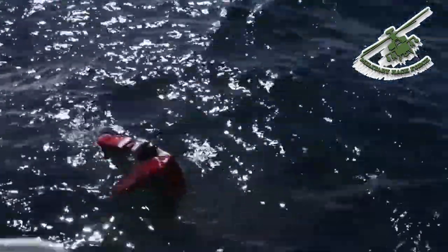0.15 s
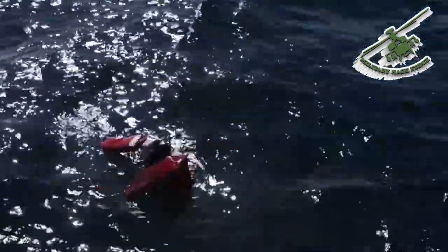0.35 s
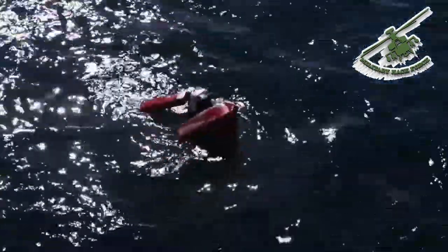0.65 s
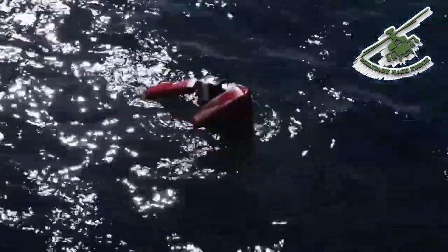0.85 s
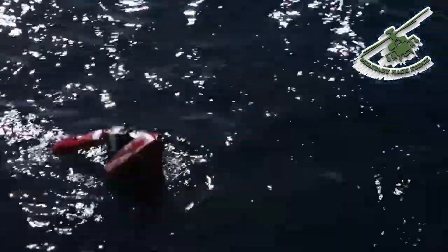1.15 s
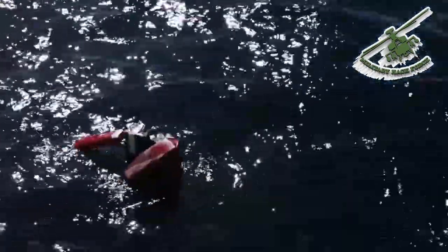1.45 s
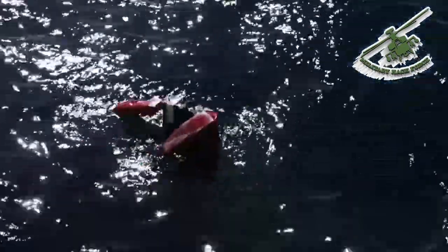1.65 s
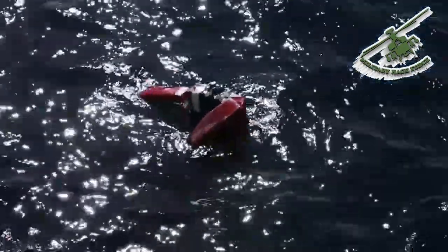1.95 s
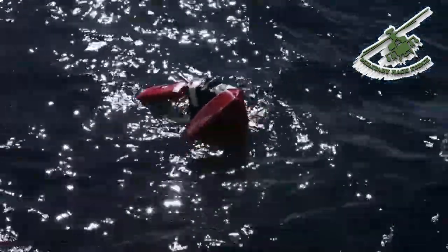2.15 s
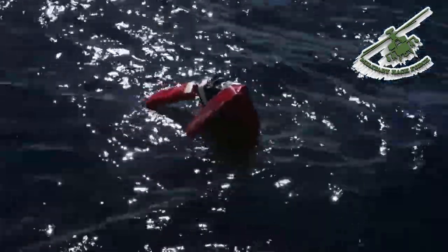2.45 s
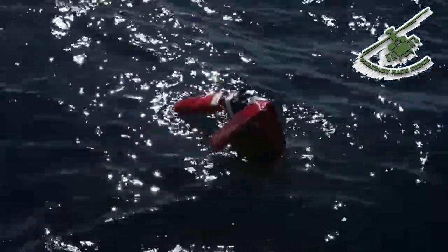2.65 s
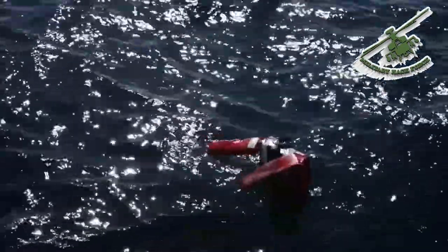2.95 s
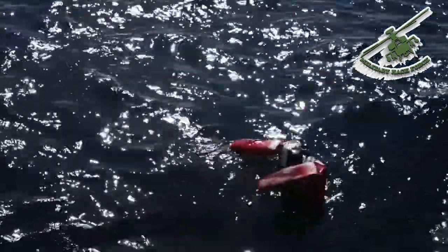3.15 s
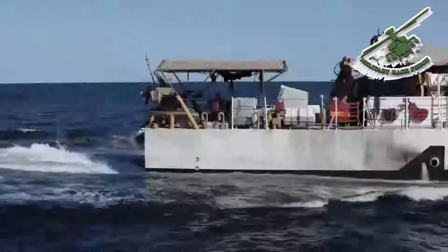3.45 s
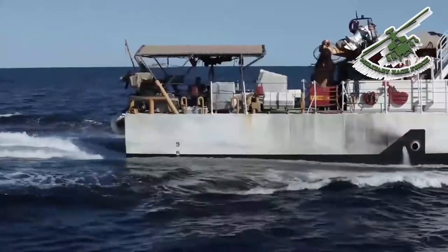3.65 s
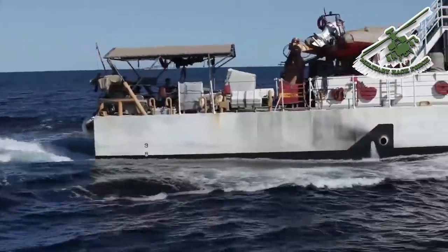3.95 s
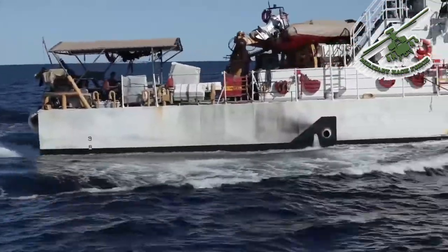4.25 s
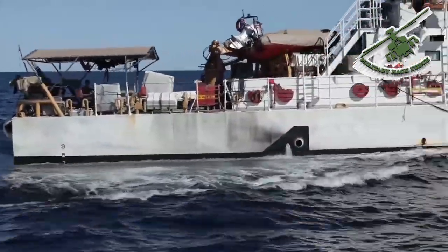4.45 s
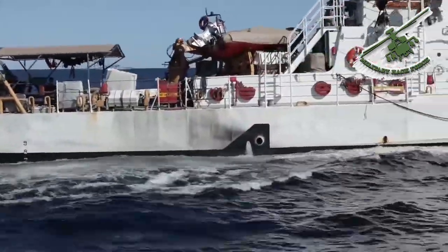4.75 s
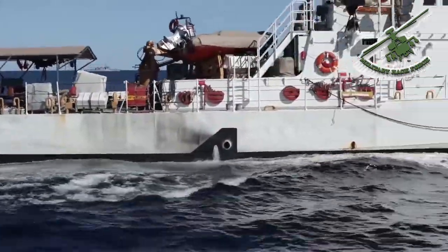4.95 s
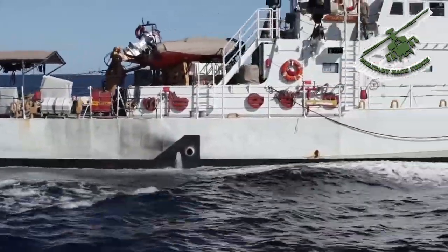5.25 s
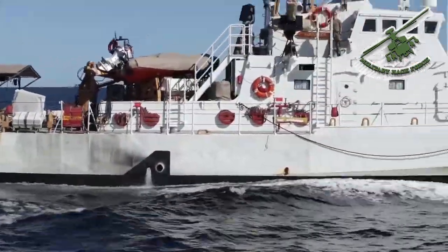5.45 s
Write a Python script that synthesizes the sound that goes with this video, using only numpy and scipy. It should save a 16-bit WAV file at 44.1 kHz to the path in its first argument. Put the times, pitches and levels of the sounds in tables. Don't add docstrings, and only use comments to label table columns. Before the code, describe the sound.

Wind buffets the microphone over lapping hull wash and small splashes, then a hard cut to a fast boat roaring past and a steady engine drone.

```python
import sys
import numpy as np
from scipy import signal
from scipy.fft import rfft, irfft
from scipy.io import wavfile

SR = 44100
rng = np.random.default_rng(int(sys.argv[2]) if len(sys.argv) > 2 else 0)


def wav_record(signal):
    frames = np.transpose(np.atleast_2d(signal))
    bounded = np.clip(frames, -1, 1)
    quanta = np.round(bounded * 32767).astype(np.int16)
    wavfile.write(sys.argv[1], SR, quanta)


def undo_db(level):
    steps = np.asarray(level, float) / 20
    return 10 ** steps


N = 246959
CHANGE_S = 3.5062


def clock():
    return np.arange(N) / SR


def in_time(rows):
    s, *columns = np.transpose(rows)
    return [np.interp(clock(), s, column) for column in columns]


def rms_one(x):
    return x / np.sqrt(np.mean(np.abs(x) ** 2) + 1e-20)


def drift(rate):
    r = np.exp(-80 * np.pi * rate / SR)
    slow = signal.lfilter([1], [1, -2 * r, r * r], rng.standard_normal(N // 40 + 2002))[2000:]
    tame = 2 * np.tanh(rms_one(slow) / 2)
    return np.interp(np.arange(N) / 40, np.arange(len(slow)), tame)


def band(x, low_hz, high_hz):
    return signal.sosfilt(signal.butter(2, [low_hz, high_hz], "band", fs=SR, output="sos"), x)


def water(spectrum, patchy_db, shared_db):
    hz, level_db = np.transpose(spectrum)
    bins = np.arange(N // 2 + 1) * SR / N + 1
    coloured = rfft(rng.standard_normal(N)) * undo_db(np.interp(np.log(bins), np.log(hz), level_db))
    out, together = 0, drift(27.0)
    for centre in np.arange(np.log2(hz[0]), np.log2(hz[-1]) + .5, .5):
        share = np.clip(1 - 2 * np.abs(np.log2(bins) - centre), 0, 1)
        flicker = undo_db(patchy_db * drift(25.0) + shared_db * together)
        out = out + irfft(coloured * share, N) * flicker
    return rms_one(out)


def resonance(hz, width_hz, steady=0):
    r = np.exp(-np.pi * width_hz / SR)
    noise = rng.standard_normal(N) + 1j * rng.standard_normal(N)
    slow = signal.lfilter([1], [1, -2 * r, r * r], noise)
    slow = slow / (np.abs(slow) + 1e-9) ** np.clip(steady, 0, 1)
    turns = np.cumsum(hz * np.ones(N)) / SR
    return rms_one(np.real(slow * np.exp(2j * np.pi * turns)))


def group(modes, steady, ratio=1):
    return rms_one(sum(undo_db(db) * resonance(hz * ratio, width_hz, steady) for hz, width_hz, db in modes))


# time in seconds, wash level in dB.
HULL_SWELL = [(0.0, -52.5), (0.91, -52.5), (1.23, -49.5), (1.6, -51), (1.81, -50.5), (2.26, -53),
              (2.89, -57.5), (3.1, -56.5), (3.5, -59.5)]
# frequency in Hz, density in dB per Hz.
WASH_COLOUR = [(41, -53), (70, -51), (114, 5), (150, -3), (362, -2.5), (676, -10), (761, -7), (902, -15),
               (1240, -10), (1420, -11), (1930, -13.5), (2450, -18.5), (4000, -39.5), (5200, -64),
               (8800, -120)]
# frequency in Hz, density in dB per Hz.
FINE_SPRAY = [(1760, -14), (3000, -5), (3520, -9.5), (5640, -19), (7140, -14), (8550, -18), (10100, -14),
              (12300, -24), (13500, -22), (15200, -36)]
# time in seconds, rise in dB.
CASING_ROLLS = [(.22, 8), (.8, 6.5), (1.15, 4), (1.63, 7.5), (1.85, 7.5), (2.05, 7.5), (2.6, 6), (2.9, 5.5),
                (3.2, 3.5)]


def idling():
    wash_db, = in_time(HULL_SWELL)
    swell_db = wash_db + 53
    rolls_db = sum(db * np.exp(-((clock() - s) / .12) ** 2) for s, db in CASING_ROLLS)
    wash = undo_db(wash_db + 2.0) * water(WASH_COLOUR, 1.5, .6)
    spray = undo_db(-70.5 + 0.69 * swell_db) * water(FINE_SPRAY, 0.97, 0.61)
    casing_hz = 1295 + 35.0 * drift(1.2)
    casing = undo_db(-63 + 0.24 * swell_db + rolls_db) * resonance(casing_hz, 220)
    engine = undo_db(-54.5 - 5.0 * clock()) * resonance(115, 24, steady=.1)
    return wash + spray + casing + engine


# time in seconds, buffeting level in dB.
GUSTS = [(0.0, -55), (0.36, -54), (0.56, -52.5), (1.09, -49), (1.55, -58), (2.48, -54.5), (3.03, -56),
         (3.2, -58), (3.3, -70)]
# time in seconds, peak in dB, pitch in Hz, sharp edge in dB.
STRONG_PUFFS = [(0.154, -34.5, 329, -51), (0.212, -31, 285, -60), (0.2835, -35, 226, -60),
                (0.3184, -29.5, 189, -41), (0.3472, -31, 350, -44), (0.3968, -33, 350, -36),
                (0.4037, -25.5, 234, -43), (0.4667, -31, 256, -38), (0.556, -30.5, 282, -42),
                (0.587, -30.5, 244, -52), (0.713, -35, 362, -37), (1.864, -28.5, 204, -44),
                (1.8868, -26.5, 322, -31.5), (1.938, -25.5, 262, -42), (1.9623, -21.5, 412, -36),
                (2.051, -34.5, 273, -45), (2.2091, -33, 306, -35.5), (2.2687, -30.5, 376, -44),
                (2.314, -30.5, 207, -45), (2.3667, -31, 382, -45), (2.4025, -31, 434, -45),
                (2.4522, -26.5, 256, -52), (2.6117, -28.5, 427, -43), (2.662, -26, 388, -43),
                (2.774, -31.5, 406, -40), (2.8989, -30, 492, -40), (2.9674, -33, 364, -42),
                (3.076, -35, 488, -42), (3.111, -32, 351, -40), (3.2021, -27.5, 380, -40)]
# time in seconds, peak in dB, pitch in Hz, sharp edge in dB.
BLAST = [(1.082, -29, 230, -52), (1.088, -29, 230, -50), (1.0958, -14, 259, -31), (1.1014, -17, 330, -33),
         (1.1066, -31, 300, -33), (1.1104, -23.5, 480, -31.5), (1.1167, -25, 323, -42),
         (1.135, -28, 356, -34), (1.1621, -32, 405, -55), (1.1795, -34, 390, -50), (1.188, -31.5, 324, -53)]
# time in seconds, peak in dB.
WEAK_PUFFS = [(.048, -38), (0.139, -38), (0.1855, -36), (.2354, -38), (.4152, -34), (.9068, -38),
              (1.3754, -34.5), (1.8232, -38), (1.8748, -32), (1.9299, -33), (2.0683, -39), (2.186, -35.5),
              (2.222, -38), (2.393, -32), (2.5973, -37), (2.633, -31), (2.697, -34), (2.717, -38),
              (2.8026, -33), (2.988, -33.5), (3.0273, -35.5), (3.059, -36), (3.2244, -37)]


def shed_eddies(eddy_hz):
    gap_s, loss_db = .008, 9
    eddies = []
    for s, peak_db, _, edge_db in STRONG_PUFFS:
        for side, (late, size, pitch) in zip((-1, 1), rng.normal(0, 1, (2, 3))):
            at_s = s + side * gap_s * (1 + abs(late))
            eddies.append((at_s, peak_db - loss_db + 1.7 * size, eddy_hz * undo_db(1.5 * pitch), edge_db - loss_db))
    return eddies


def puffs():
    eddy_hz, cycles = 270, 1.2
    light = [(s, db, eddy_hz, db - 13.0) for s, db in WEAK_PUFFS]
    gusty = STRONG_PUFFS + shed_eddies(eddy_hz) + light
    rows = [(row, 690) for row in gusty] + [(row, 840) for row in BLAST]
    out, t = np.zeros(N), np.arange(-900, 900) / SR
    for (row, edge_hz), (turn, edge_turn, spread) in zip(rows, rng.normal(0, 1, (len(rows), 3))):
        s, peak_db, hz, edge_db = row
        lean = 0.15 + 0.15 * turn
        push = np.exp(-(t * hz * 2 / cycles) ** 2) * np.cos(2 * np.pi * (hz * t + lean))
        edge_turns = edge_hz * undo_db(1.7 * spread) * t + edge_turn
        edge = np.exp(-(t / 0.00096) ** 2) * np.cos(2 * np.pi * edge_turns)
        middle = round(s * SR)
        out[middle - 900:middle + 900] += undo_db(peak_db - 1.9) * push + undo_db(edge_db + 1.0) * edge
    bass_cut = signal.butter(2, 95, "high", fs=SR, output="sos")
    return signal.sosfiltfilt(bass_cut, out)


def wind():
    gust_db, = in_time(GUSTS + [(3.33, -81)])
    sizes = undo_db(3.0 * np.minimum(rng.exponential(1, N), 2.5)) * rng.choice([-1, 1], N)
    bumps = sizes * (rng.random(N) < 700 * undo_db(4 * drift(10.0)) / SR)
    buffeting = undo_db(gust_db + .8) * rms_one(band(band(bumps + 1e-18, 87, 430), 93, 1220))
    rumble_db = -64.5 + .6 * (gust_db + 54) + 4 * drift(2.9)
    rumble = undo_db(rumble_db) * rms_one(band(rng.standard_normal(N), 30, 58))
    return buffeting + rumble + puffs()


# start in seconds, spray in dB, decay by 60 dB in seconds,
# drop ring in Hz, drop ring in dB.
SLAPS = [(.33, -62, 0.35, 9000, -71), (0.5328, -60, 0.047, 1900, -28), (.70, -60, .06, 5000, -66),
         (1.272, -58, 0.11, 2970, -53.5), (1.577, -59, 0.053, 7000, -61), (2.071, -47, 0.07, 3480, -50),
         (2.128, -52, 0.016, 6000, -58), (2.262, -57, 0.055, 4730, -66), (2.667, -52.5, 0.12, 1670, -42.5),
         (2.708, -57, 0.035, 6900, -58), (2.73, -61, 0.42, 7100, -73), (3.089, -52, 0.014, 1800, -41),
         (3.0925, -70, .05, 4800, -47), (3.0922, -49, 0.068, 1510, -40), (3.129, -61, 0.032, 6800, -59),
         (3.288, -55, 0.03, 2520, -52)]
# time in seconds, peak in dB.
EXTRA_SNAPS = [
    (3.0896, -34),
    (3.0917, -27.5),
]


def splashes():
    crackle = undo_db(2.5 * rng.standard_normal(N // 20 + 1).repeat(20)[:N])
    spray = rms_one(band(water(FINE_SPRAY, 3.0, 1.0), 3200, 13000) * crackle)
    out, t, snap_s = np.zeros(N), np.arange(8000) / SR, .0001
    snap = band(-np.exp(-((t - 4 * snap_s) / snap_s) ** 2), 900, 6500)
    for slap, noise in zip(SLAPS, rng.standard_normal((len(SLAPS), 8000))):
        s, spray_db, t60, ring_hz, ring_db = slap
        at = slice(round(s * SR), round(s * SR) + 8000)
        shape = (1 - np.exp(-t / 0.00086)) * undo_db(-60 * t / max(t60, .008))
        rough = band(band(noise, .65 * ring_hz, 1.35 * ring_hz), .5 * ring_hz, 1.5 * ring_hz)
        ring = .45 * np.sin(2 * np.pi * ring_hz * t) + .5 * rms_one(rough)
        out[at] += shape * (undo_db(spray_db - 6.0) * spray[at] + undo_db(ring_db) * ring)
        out[at] += undo_db(spray_db + 8.0) * snap
    for s, peak_db in EXTRA_SNAPS:
        start = round(s * SR)
        out[start:start + 8000] += undo_db(peak_db) * snap
    return out


# time in seconds, roar of engines and wash in dB.
ROAR_LEVEL = [(3.51, -24), (3.55, -23.5), (3.64, -22.5), (3.68, -19.5), (3.85, -21.5), (3.93, -26.5),
              (4.58, -26), (4.68, -30), (5.0, -29), (5.54, -28), (5.6, -32)]
# frequency in Hz, density in dB per Hz.
ROAR_COLOUR = [(25, -27), (108, -19.5), (150, -10.5), (230, -11), (370, -4.5), (550, -3.5), (700, -9),
               (850, -1), (1100, -1), (1350, -5), (1860, -4.5), (2700, -9), (3500, -20), (4500, -25.5),
               (6000, -44)]
# frequency in Hz, density in dB per Hz.
BOW_COLOUR = [(1760, -20), (3000, -17), (3320, -11), (5170, -9), (6070, -10), (7280, -6.5), (8790, -11),
              (10300, -7), (13600, -20), (14900, -23)]
# frequency in Hz, width in Hz, level in dB.
DRONE_MODES = [(244.2, 48, -55.5), (287.2, 17, -50.5), (589.4, 14, -51.5), (660, 34, -46), (1002, 51, -67),
               (1204, 34, -55.5), (1564, 80, -53.5), (1800, 160, -49.5), (1933, 58, -50.5), (2140, 48, -59)]
# frequency in Hz, width in Hz, level in dB.
LOW_ENGINE = [(172.8, 9.1, 0.5), (191.8, 5.8, -1)]
# frequency in Hz, width in Hz, level in dB.
MID_ENGINE = [(450.5, 17, 0.037), (464.5, 6.9, -2.5), (492, 3, -0.85)]
# time in seconds, pitch in Hz, level in dB.
WAKE_ECHO = [(3.505, 899.4, -29.5), (4.1, 780, -38), (4.3, 880, -35), (4.55, 928, -32.5), (5.0, 897, -36),
             (5.13, 851, -42), (5.22, 777.4, -36.5), (5.6, 763, -38.5)]


def vessel():
    (roar_db,), (wake_hz, wake_db) = in_time(ROAR_LEVEL), in_time(WAKE_ECHO)
    since = np.maximum(clock() - CHANGE_S, 0)
    turn = 2 * np.pi * np.cumsum(37.12 * (1 + 0.022 * drift(2.9))) / SR
    firing = 1 + 0.11 * (np.cos(turn) + 0.19 * np.cos(2 * turn))
    out = undo_db(roar_db - 4.5) * water(ROAR_COLOUR, 2.5, 0.47) * firing
    orders_db = 9.0 * np.exp(-(since / 0.068) ** 2) - since
    dip_db = 15 * np.exp(-((clock() - 3.9) / 0.22) ** 4)
    low_db = orders_db - dip_db - 45.5 + 1.5 * drift(4.0)
    mid_db = orders_db - 0.26 * dip_db - 38.5 + 1.5 * drift(4.0)
    out += undo_db(low_db) * group(LOW_ENGINE, steady=0.5) + undo_db(mid_db) * group(MID_ENGINE, steady=0.65)
    drone = sum(undo_db(db) * resonance(hz, width_hz, steady=0.043) for hz, width_hz, db in DRONE_MODES)
    out += undo_db(2.5 + 1.0 * drift(3.4)) * drone
    wake = resonance(wake_hz, 270) + undo_db(-5.0) * resonance(2 * wake_hz, 500)
    out += undo_db(wake_db + 2.5 * drift(8.6)) * wake
    spray_db = -51.5 + 6.5 * np.exp(-(since / 0.4) ** 2)
    return out + undo_db(spray_db) * water(BOW_COLOUR, 1.5, 0.73)


# time in seconds, pitch ratio, exhaust level in dB.
PASS_BY = [
    (3.505, 1.045, -29),
    (3.7, 0.97, -28),
    (3.8, 0.95, -28),
    (3.89, 0.88, -34),
    (3.96, 0.9, -37),
    (4.15, .9, -51.5),
    (4.3, 1.6, -84),
]
# frequency in Hz, width in Hz, level in dB.
EXHAUST_MODES = [(775, 45, 0), (850, 50, -4), (1040, 70, -5), (1220, 70, -10), (1500, 50, -9),
                 (1740, 120, -8), (2650, 300, -12), (3900, 900, -22)]
# time in seconds, level in dB.
EXHAUST_SURGES = [
    (3.68, -41),
    (3.785, -41),
    (3.885, -41),
]


def fast_boat():
    ratio, exhaust_db = in_time(PASS_BY)
    low_db = -31 - 8.5 * ((clock() - 3.854) / .35) ** 2
    low_note = undo_db(low_db) * resonance(275.4, 64, steady=0.45)
    surges = sum(undo_db(db) * np.exp(-((clock() - s) / .014) ** 2) for s, db in EXHAUST_SURGES)
    bright_exhaust = surges * resonance(3300, 1500)
    return undo_db(exhaust_db) * group(EXHAUST_MODES, 0.4, ratio) + low_note + bright_exhaust


def scene():
    t = clock() - CHANGE_S
    first = (idling() + wind() + splashes()) * np.clip((-t - .003) / 0.0023, 0, 1)
    second = (vessel() + fast_boat()) * np.clip(t / 0.0028, 0, 1) ** 2
    return (first + second)[None]


# treble level in dB, upper limit in Hz.
TOP_LIMIT = [(-81, 12000), (-75, 13500), (-60, 14700), (-45, 15000)]


def thin_top(x):
    hz, _, frames = signal.stft(x, SR, "cosine", 2048, 1024)
    treble = frames[(hz > 4000) & (hz < 12000)]
    treble_db = 10 * np.log10(1.62 * np.sum(np.abs(treble) ** 2, axis=0) + 1e-14)
    edge_hz = np.interp(treble_db, *np.transpose(TOP_LIMIT)) + 450 * rng.standard_normal(len(treble_db))
    edge_hz = 15095 - 689 * np.round((15095 - edge_hz) / 689)
    return signal.istft(frames * (hz[:, None] < edge_hz), SR, "cosine", 2048, 1024)[1][:N]


def band_limit(x):
    return signal.sosfilt(signal.butter(12, 15090, fs=SR, output="sos"), x)


def record(dry):
    rounded = 0.43 * np.tanh(dry[0] / 0.47)
    mix = thin_top(rounded)[None]
    return band_limit(mix)


dry = scene()
out = record(dry)
wav_record(out)
```